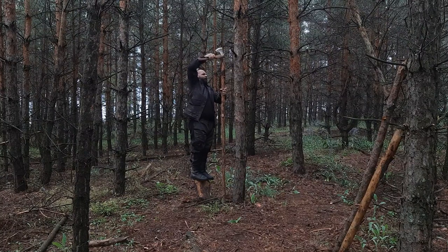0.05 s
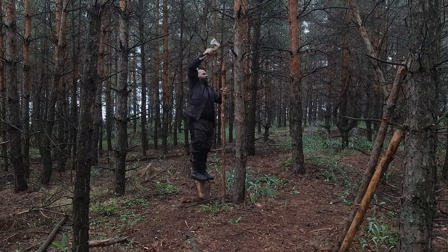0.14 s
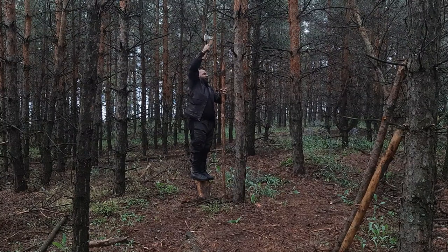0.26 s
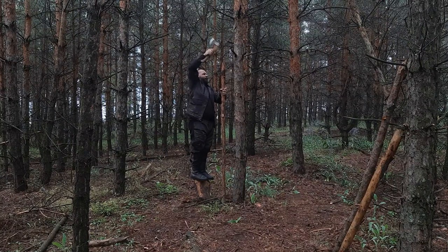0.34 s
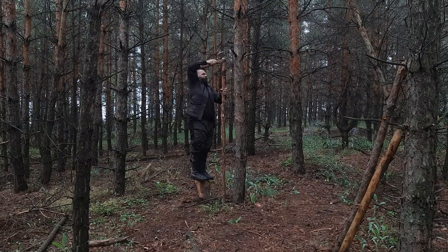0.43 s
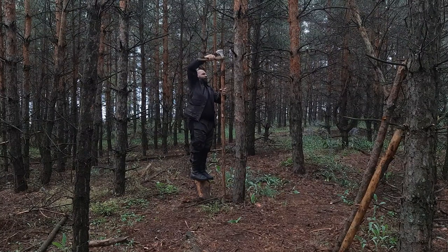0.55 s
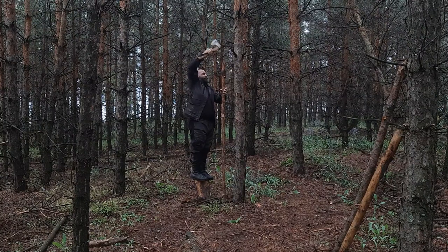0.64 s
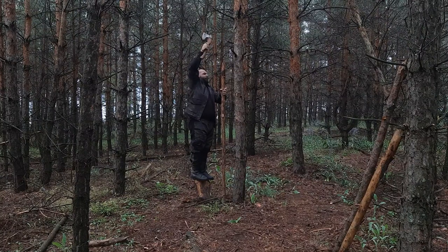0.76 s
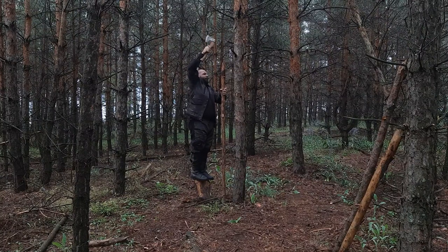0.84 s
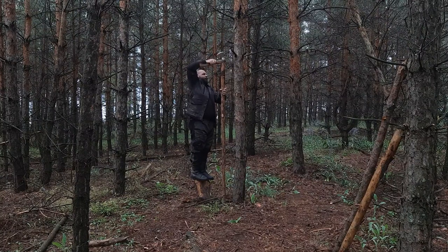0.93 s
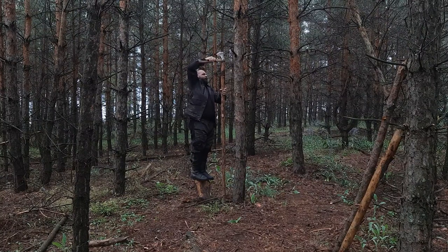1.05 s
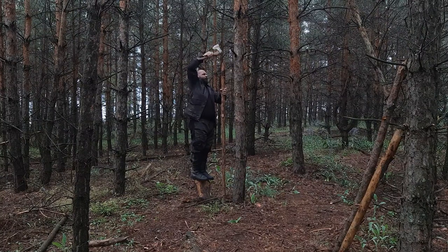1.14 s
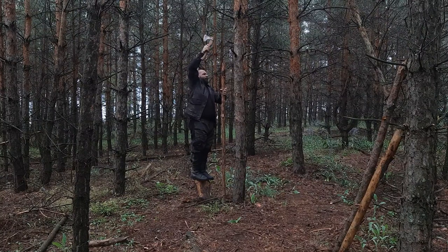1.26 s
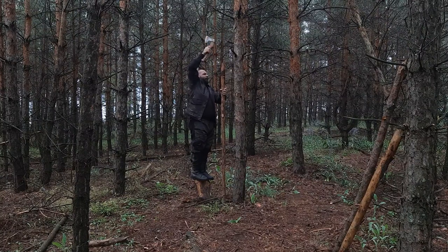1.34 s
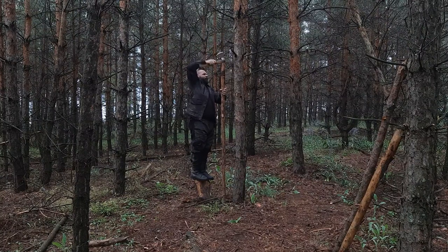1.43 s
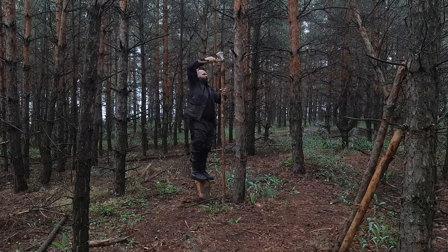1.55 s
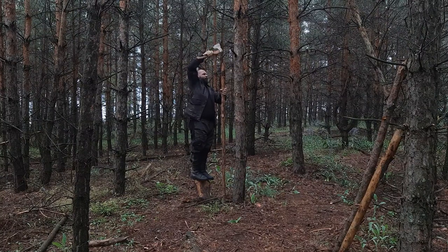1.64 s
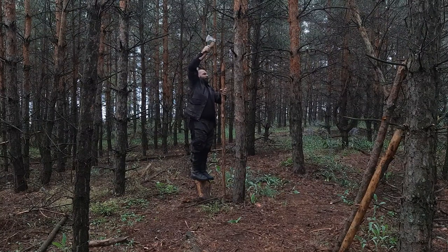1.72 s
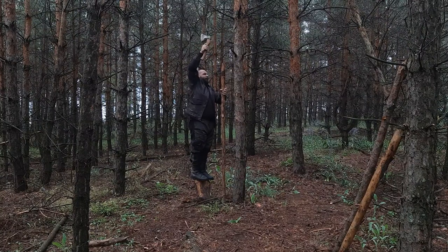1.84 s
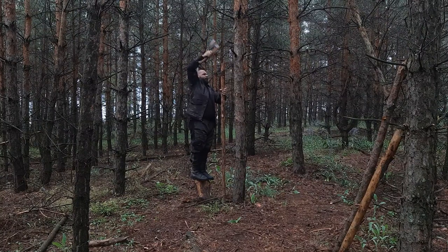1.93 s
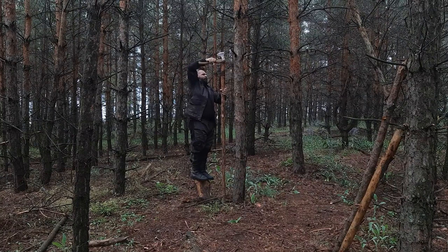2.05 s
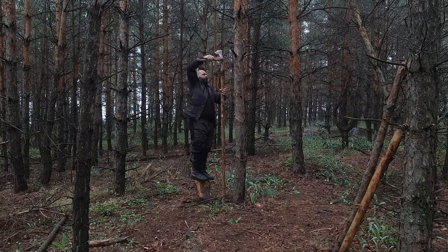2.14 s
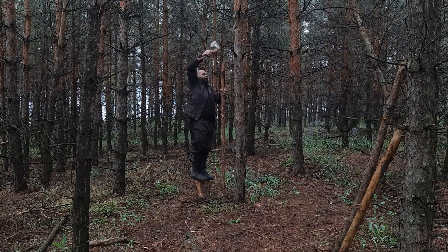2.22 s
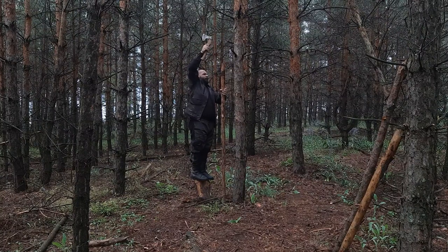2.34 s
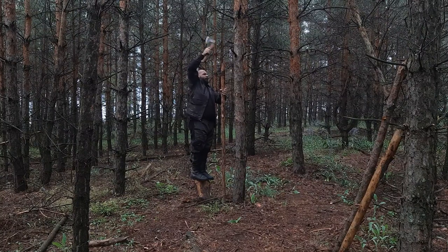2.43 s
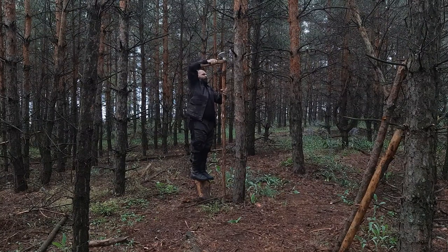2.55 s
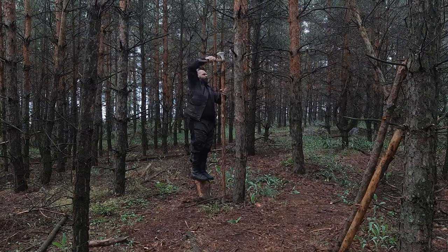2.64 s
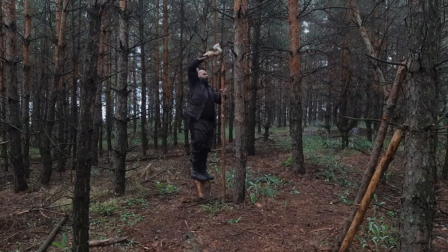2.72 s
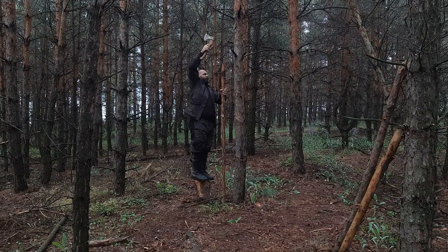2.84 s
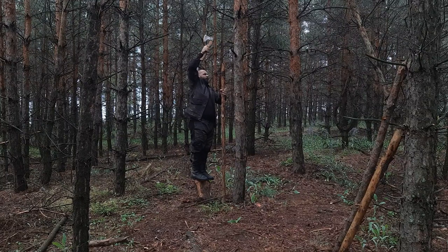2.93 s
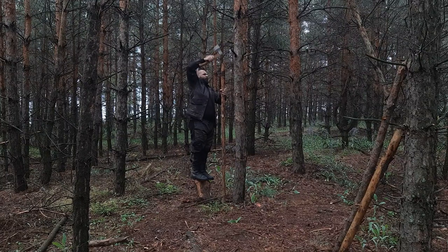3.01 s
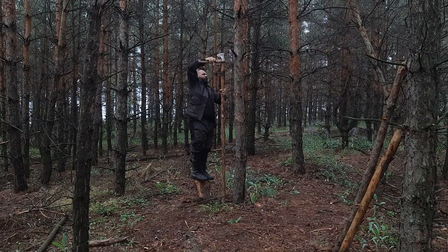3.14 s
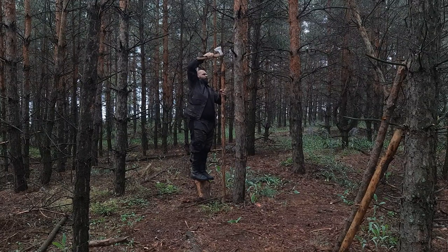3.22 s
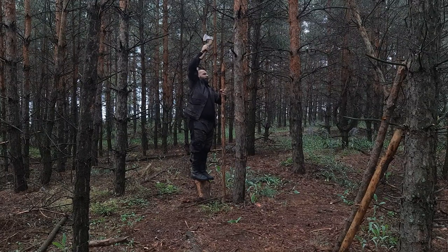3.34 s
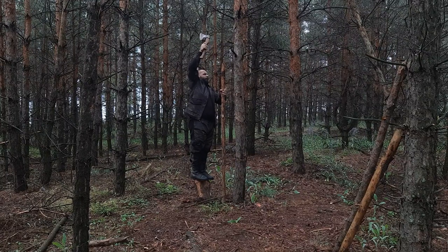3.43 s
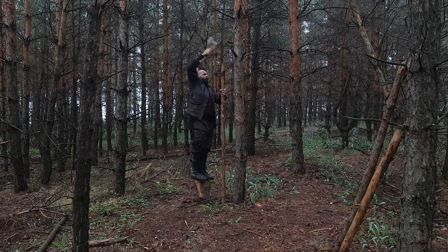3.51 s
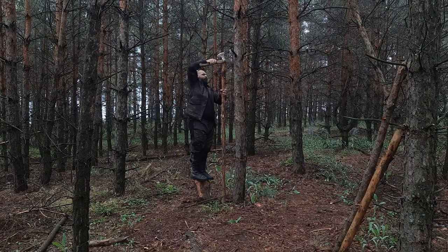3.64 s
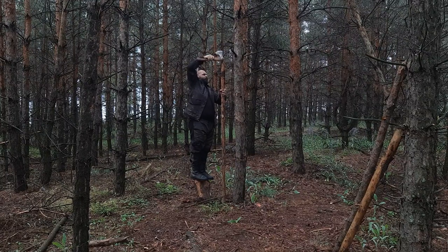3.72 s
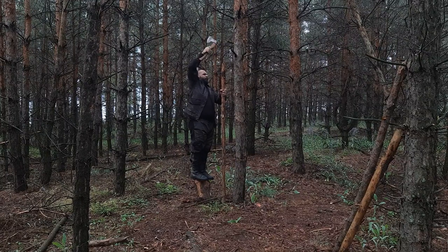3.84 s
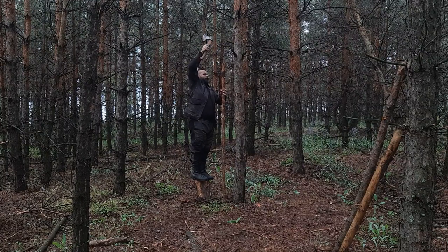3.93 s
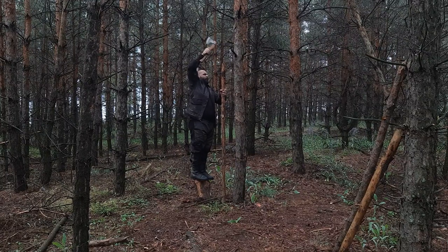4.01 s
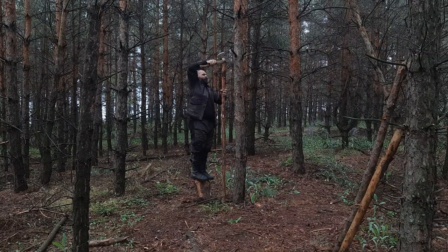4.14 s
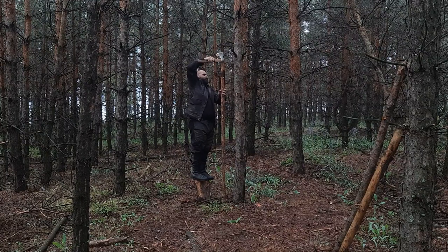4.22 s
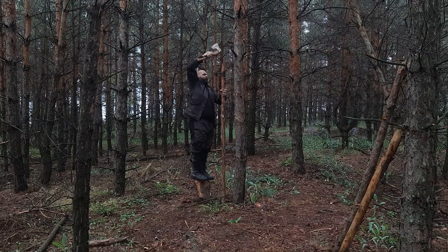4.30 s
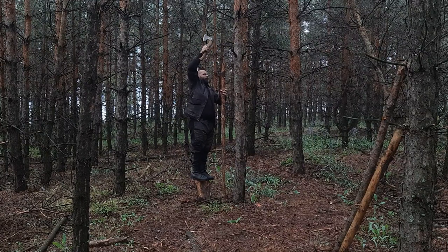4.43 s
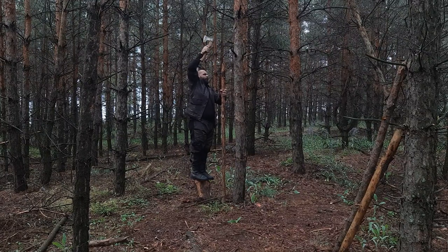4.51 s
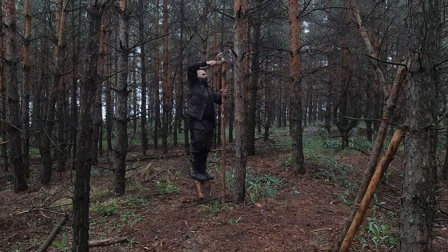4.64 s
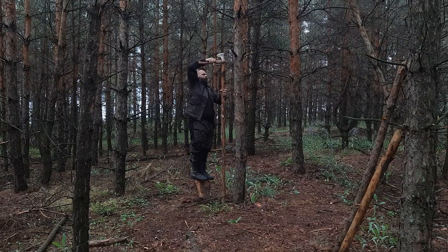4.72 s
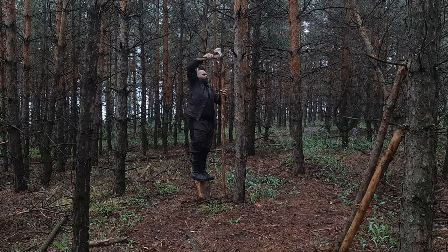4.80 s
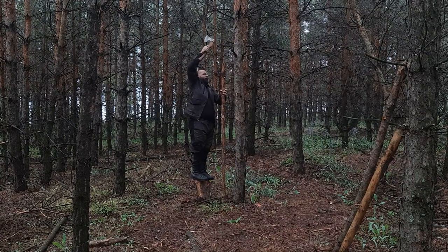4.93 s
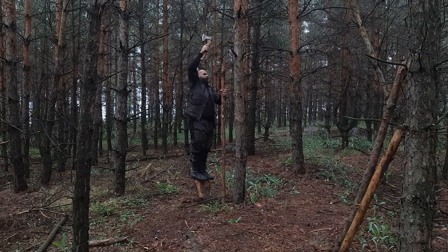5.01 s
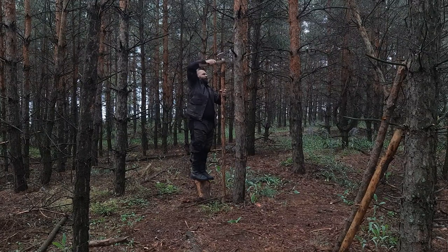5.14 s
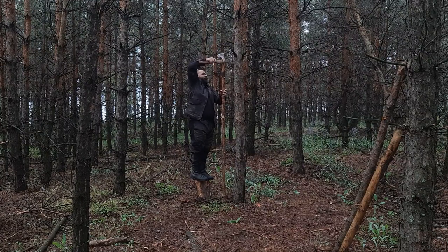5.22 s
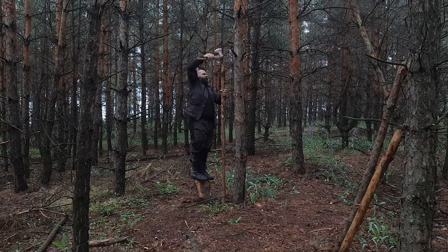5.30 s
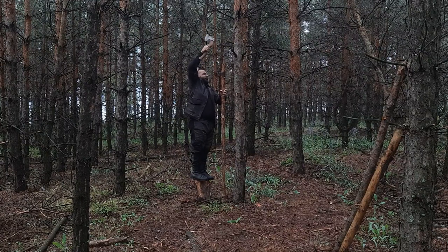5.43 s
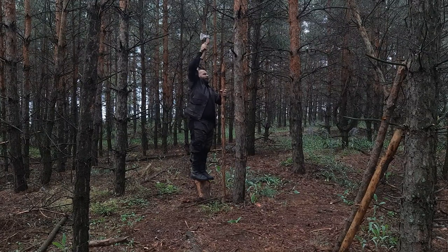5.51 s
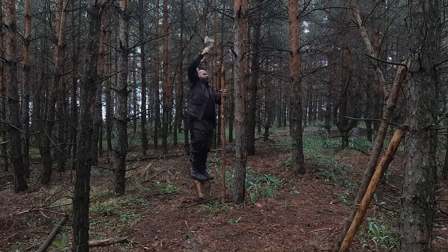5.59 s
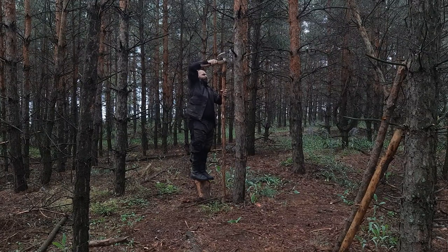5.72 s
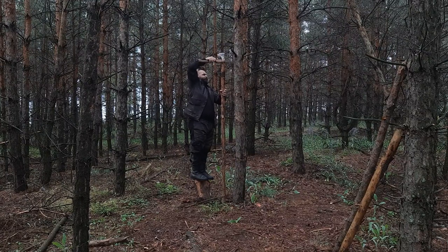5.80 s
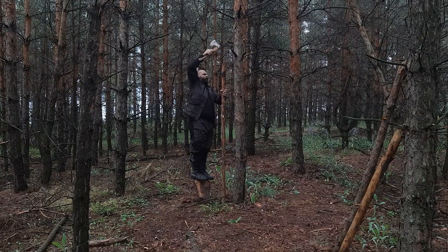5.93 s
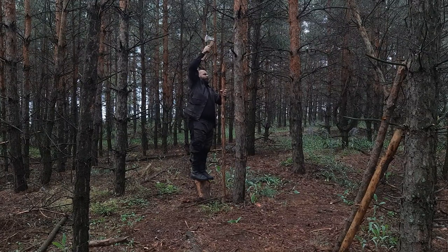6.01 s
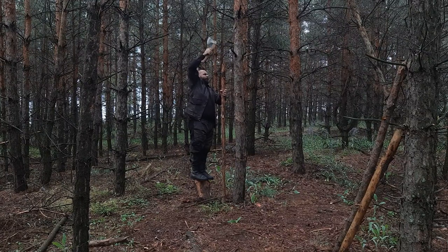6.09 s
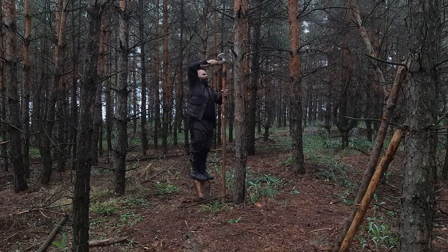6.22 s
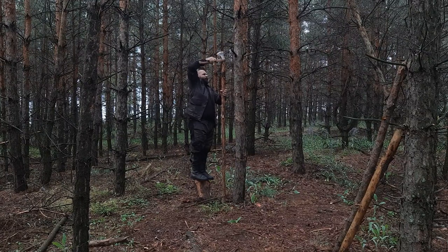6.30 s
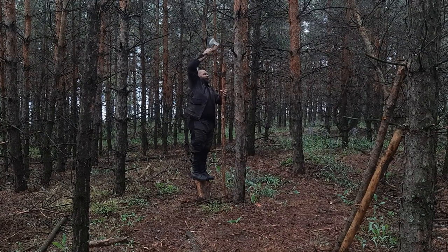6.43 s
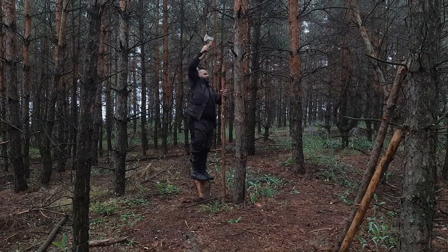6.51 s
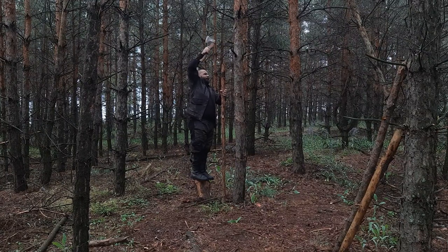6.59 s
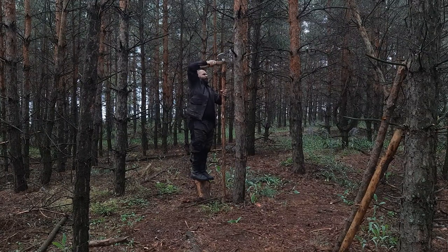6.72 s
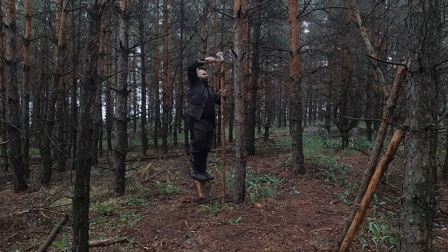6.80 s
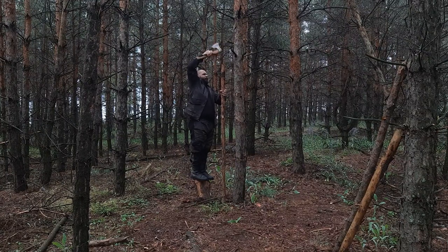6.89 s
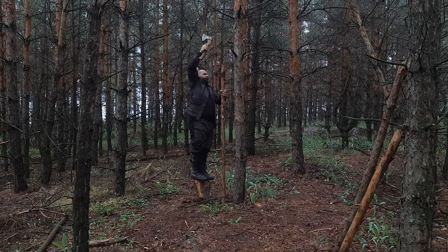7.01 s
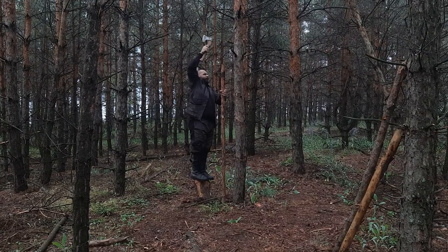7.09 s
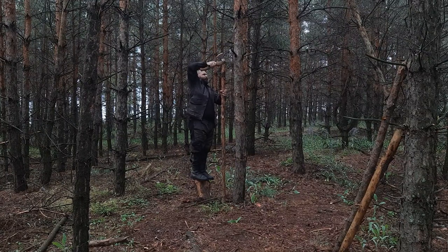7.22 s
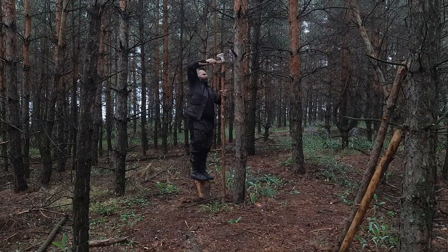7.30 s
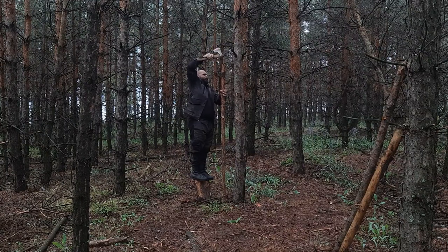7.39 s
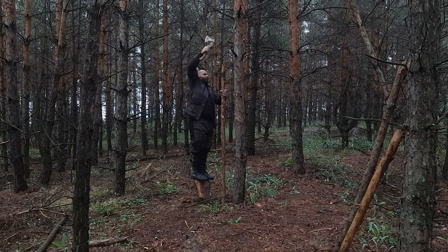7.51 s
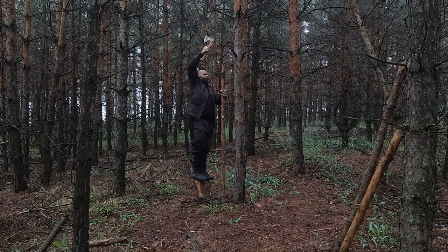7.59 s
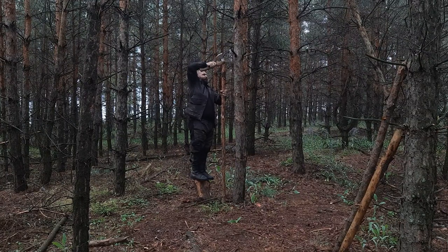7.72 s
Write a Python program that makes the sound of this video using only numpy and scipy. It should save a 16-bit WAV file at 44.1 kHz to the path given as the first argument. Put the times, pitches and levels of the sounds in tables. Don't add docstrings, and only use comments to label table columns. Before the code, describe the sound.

Regular axe-back blows on wood, roughly two a second, uneven in force: most are loud and crisp, a few softer, one near the end very weak and hollow. Short dry cracks with a low body scatter into a forest reverberation lasting about a second. Between them, tiny distant bird trills, high chips and thin whistles over a quiet, dull rumble and faint hiss. Single steady mono microphone at some distance.

```python
import sys
import numpy as np
from scipy import signal
from scipy.fft import rfft, irfft
from scipy.io import wavfile
from scipy.ndimage import uniform_filter1d

SR = 44100
rng = np.random.default_rng(int(sys.argv[2]) if len(sys.argv) > 2 else 0)


def master_out(mix):
    frames = np.transpose(np.atleast_2d(mix))
    ceiling = np.clip(frames, -1, 1)
    pcm = np.round(ceiling * 32767).astype(np.int16)
    wavfile.write(sys.argv[1], SR, pcm)


def elevation(decibels):
    levels = np.asarray(decibels, float)
    return 10 ** (levels / 20)


N = 341775

BLOWS = [(0.0523, 1.5, -2.5, -2, 0.5), (.575, 2.5, -1.5, -2, -0.4), (1.0999, -4, -0.7, -6.5, 0.5),
         (1.6019, -3.5, -2.5, -5.5, 2.5), (2.1452, -0.5, 2, 6.5, -9), (2.675, 1.5, -3.5, -2, 0.4),
         (3.209, -3.5, -4, -6.5, 4), (3.7391, 2, 3, -1, -1), (4.2557, 3, -2, 0, -0.8),
         (4.7856, -7, -3.5, -3.5, 7), (5.3076, 3.5, 4.5, 0.5, -3.2), (5.8447, 4, 1.5, 5, -0.8),
         (6.3376, -14, 4, -6, 11.5), (6.8483, 0.5, -0.3, 2.5, -0.3), (7.3677, 2.5, -1, 0, -0.5)]


def evened(x):
    return x / np.sqrt(np.mean(x ** 2) + 1e-20)


def read(points, hz, column=1):
    columns = np.transpose(points)
    return np.interp(np.log(hz + 1), np.log(columns[0] + 1), columns[column])


def add(mix, s, sound):
    at = round(s * SR)
    sound = sound[max(-at, 0):]
    part = mix[max(at, 0):][:len(sound)]
    part += sound[:len(part)]


def late(x, s):
    lag = round(s * SR)
    return np.concatenate([np.zeros(lag), x[:len(x) - lag]])


def ring(modes, t, contact_s, tune=1):
    free = np.zeros(len(t))
    for hz, db, t60, sign in modes:
        free += sign * elevation(db - 60 * t / t60) * np.sin(2 * np.pi * hz * tune * t)
    force = np.sin(np.pi * np.clip(t[:600] / contact_s, 0, 1))
    return np.convolve(free, force / force.sum())[:len(t)]


def levels(s, knock_db, bright_db, tick_db, hollow_db):
    lower_db = 0.78 + 0.34 * knock_db + 0.13 * bright_db
    thump_db = 0.33 - .03 * knock_db
    return s, knock_db, thump_db, lower_db, knock_db + bright_db, tick_db, knock_db + hollow_db


def steel_tick(t, tick_db):
    # frequency in Hz, level in dB per Hz.
    tick_spectrum = [(1760, -17.5), (3000, -6), (4300, -12.5), (5900, -5), (7840, -10), (9180, -17.5),
                     (12200, -22), (15300, -31.5)]
    tick_t60, splinter_t60, splinter_share = .005, .03, .25
    decay = elevation(-60 * t / tick_t60) + splinter_share * elevation(-60 * t / splinter_t60)
    burst = late(rng.standard_normal(len(t)) * decay, .0024)
    colour = elevation(read(tick_spectrum, np.fft.rfftfreq(len(t), 1 / SR)))
    steel = irfft(rfft(burst) * colour)
    return elevation(tick_db - 24.5) * steel / abs(steel).max()


def wood_knock(t, lower_db, knock_db, upper_db, hollow_db):
    # frequency in Hz, level in dB, t60 in seconds, sign of the push.
    lower_modes = [(530, -15, .012, -1), (640, -27, .05, 1), (714, -22, .07, 1), (808, -28, .07, 1)]
    main_modes = [(1231, -6, .014, -1), (1498, -9, .012, 1), (1666, -23, .09, -1)]
    upper_modes = [(1842, -26, .06, 1), (2134, -30, .025, 1), (2220, -25, .046, 1), (2655, -22, .012, 1)]
    # frequency in Hz, level in dB, t60 in seconds, sign.
    hollow_mode = [(1005, -13, .02, 1)]
    groups = [(lower_db, lower_modes), (knock_db, main_modes), (upper_db, upper_modes), (hollow_db, hollow_mode)]
    knock = np.zeros(len(t))
    for db, modes in groups:
        tune = 1 + .006 * np.clip(rng.standard_normal(), -2, 2)
        knock += elevation(db) * ring(modes, t, .0004, tune)
    return knock


def pole_thump(t, thump_db):
    # frequency in Hz, level in dB, t60 in seconds, sign of the push.
    bending_modes = [(100, -16.3, .055, -1), (172, -9.2, .043, 1), (276, -10.5, .04, -1),
                     (60, -34, .14, -1), (345, -25, .03, 1)]
    return elevation(thump_db) * ring(bending_modes, t, .0025)


def blow(s, knock_db, thump_db, lower_db, upper_db, tick_db, hollow_db):
    t = np.arange(8192) / SR
    steel = steel_tick(t, tick_db)
    knock = late(wood_knock(t, lower_db, knock_db, upper_db, hollow_db), .0026)
    thump = late(pole_thump(t, thump_db), .0024)
    mirrored = late(-.6 * steel - .75 * knock, .00168)
    return s - .002, (steel + knock + mirrored + thump) * signal.windows.tukey(len(t), .02)


def head_hum(knock_db, bright_db):
    hum_db = -57 + 1.2 * (knock_db + bright_db)
    return ring([(1860, hum_db, .9, 1)], np.arange(SR) / SR, .0004)


def axe_on_pole():
    # start in seconds, frequency in Hz, level in dB, t60 in seconds.
    off_spot = [
        (1.1003, 2042, -12.5, 0.0155),
        (1.1003, 727, -21, .04),
        (2.1467, 770, -7, 0.027),
        (2.1463, 2404, -16.5, 0.028),
        (4.2562, 2103, -15, 0.0327),
        (5.3092, 1369, -26, 0.079),
        (6.3405, 1938, -19.5, 0.0204),
        (6.3381, 350, -17, 0.0262),
        (7.3684, 2030, -16.5, .025),
    ]
    # delay in seconds, level in dB.
    trunks = [
        (0.015, -22),
        (0.032, -32),
        (0.053, -30),
        (.125, -31.5),
    ]
    axe = np.zeros(N)
    for row in BLOWS:
        add(axe, *blow(*levels(*row)))
    for s, *mode in off_spot:
        add(axe, s, ring([(*mode, 1)], np.arange(6000) / SR, .0004) * np.linspace(1, 0, 6000))
    for s, knock_db, bright_db, *_ in BLOWS:
        add(axe, s, head_hum(knock_db, bright_db))
    for delay, db in trunks:
        add(axe, delay, elevation(db) * signal.lfilter([1, -1], [1, -.92], axe))
    return axe


def all_round(s, knock_db, thump_db, lower_db, upper_db, tick_db, _):
    # frequency in Hz, level in dB.
    usual_power = [(200, -4.5), (850, -7), (1350, -14.5), (2200, -19), (5000, -22.5)]
    hz, usual_db = np.transpose(usual_power)
    change_db = (thump_db, lower_db, knock_db, upper_db, 0.6 * tick_db)
    colour = np.transpose([hz, usual_db + change_db])
    click = irfft(elevation(read(colour, np.fft.rfftfreq(512, 1 / SR))))
    return s - 256 / SR, 23.54 * np.roll(click, 256) * np.hanning(512)


def forest(x):
    # frequency in Hz, early level in dB, early t60 in seconds,
    # late level in dB, late t60 in seconds.
    scattering = [(58, -24.5, 0.48, -50.5, 0.56), (163, -12.5, 0.25, -36.5, 0.81),
                  (380, -24.5, 0.16, -34.5, 0.3), (648.6, -13.5, 0.32, -22, 1.35),
                  (1620, -8, 0.31, -18, 1.34), (2510, -19, 0.32, -19.5, 0.76),
                  (3140, -24, 0.28, -23.5, 0.71), (6500, -28.5, 0.34, -33.5, 0.7)]
    length, out = round(1.5 * SR), np.zeros(len(x))
    turn = np.pi * (np.arange(len(x)) / SR - 1) / 1.57
    for k in range(3):
        taps = np.zeros(length)
        at = np.arange(300, length - 16, 16) + rng.integers(0, 16, (length - 301) // 16)
        taps[at] = rng.choice([-1., 1.], len(at))
        hz, t, z = signal.stft(taps, SR, nperseg=512)
        early_db, early_t60, late_db, late_t60 = (read(scattering, hz, c)[:, None] for c in range(1, 5))
        early = elevation(early_db - 60 * (t / early_t60) ** 1.225) / np.sqrt(early_t60)
        fade = np.hypot(early, elevation(late_db - 60 * t / late_t60) / np.sqrt(late_t60))
        fade *= elevation(-8.0 * np.log2(np.maximum(hz[:, None] / 7000, 1)))
        fade[hz > 15650] *= .05
        rise = 0.0012 + 14 / (hz[:, None] + 400)
        tail = signal.istft(z * fade * (1 - np.exp(-t / rise)), SR, nperseg=512)[1] * 0.14
        tail[:300] = 0
        share = np.sqrt(2 / 3) * np.cos(turn + k * np.pi / 3)
        out += signal.fftconvolve(x * share, tail)[:len(x)]
    return out


def forest_tail(axe):
    spread = np.zeros(SR + N)
    add(spread, .53, all_round(*levels(*BLOWS[0]))[1])
    for row in BLOWS:
        s, click = all_round(*levels(*row))
        add(spread, 1 + s, click)
    spread[SR:] += 0.031 * axe
    return forest(spread)[SR:]


def note(hz, db, edge, unsteady):
    drift = evened(uniform_filter1d(rng.standard_normal(SR), 200))[:len(hz)]
    phase = 2 * np.pi * np.cumsum(hz * (1 + unsteady * drift)) / SR
    return np.sqrt(2) * elevation(db) * np.sin(phase) * signal.windows.tukey(len(hz), min(edge, 1))


def trill(s, length, db, top_hz):
    trills_per_s, slide_hz = 54, 822
    beak_hz, beak_width_hz = 3790, 140
    t = np.arange(0, length, 1 / SR)
    cycle = (trills_per_s * (t - .029)) % 1
    dips = np.interp(cycle, [0, .15, .6, 1], [1, 0, .42, 1])
    dips = uniform_filter1d(np.where(t > .02, dips, .25), 40)
    hz = top_hz + 170 - 250 * np.exp(-t / 0.055) - slide_hz * dips
    beak_db = -10 * np.log10(1 + ((hz - beak_hz) / beak_width_hz) ** 2)
    return s - .008, note(hz, db + 3.5 + beak_db - 9 * np.exp(-t / .05), .3, .004)


def chip(s, db):
    u = np.linspace(0, 1, round(.038 * SR))
    low_hz = np.interp(u, [0, .12, .5, 1], [7000, 7450, 7250, 6400])
    high_hz = np.interp(u, [0, .3, .5, 1], [7900, 8650, 8600, 7800])
    low = np.pad(note(low_hz, db, .3, .002), (0, 800))
    high = np.pad(note(high_hz, db, .3, .002), (0, 800))
    return s, late(low, .008) + elevation(-2.5) * high


def whistle(length, db, from_hz, to_hz):
    return note(np.linspace(from_hz, to_hz, round(length * SR)), db, .5, .02)


def birds():
    # start in seconds, length in seconds, level in dB, top pitch in Hz.
    trills = [
        (-.1, 0.27, -58, 3903),
        (1.449, 0.213, -62.5, 4051),
        (2.261, 0.19, -59, 3956),
        (3.077, 0.21, -58.5, 4020),
        (3.811, 0.15, -55, 3924),
        (4.502, 0.203, -61, 3919),
        (5.322, 0.1756, -55, 3930),
        (6.015, 0.18, -57.5, 3943),
        (6.773, 0.25, -62.5, 3900),
        (7.62, 0.32, -61, 3950),
    ]
    # start in seconds, level in dB.
    chips = [
        (0.18, -69),
        (1.387, -71.5),
        (3.935, -71.5),
        (5.018, -75.5),
        (6.22, -72.5),
        (7.523, -68.5),
    ]
    # start in seconds, length in seconds, level in dB, first and last pitch in Hz.
    whistles = [(.155, .03, -60, 3100, 3700), (.15, .2, -82, 7600, 6600), (.335, .11, -77, 6500, 3500),
                (.7, .18, -85, 8600, 8250), (.93, .07, -82, 7400, 7350), (1.86, .07, -83, 7600, 7100),
                (6.1, .05, -83, 7400, 7300), (2.86, .2, -84, 3260, 3180), (5.2, .12, -87, 3250, 3250),
                (4.52, .3, -84, 4800, 4800), (7.1, .1, -85, 5000, 4750), (3.6, .12, -79, 3850, 3600)]
    # start in seconds, level in dB.
    answers = [
        (1.82, -78),
        (3.5, -78),
        (4.1, -77),
        (5.74, -79),
        (6.6, -78),
    ]
    dry = np.zeros(N)
    for row in trills:
        add(dry, *trill(*row))
    for row in chips:
        add(dry, *chip(*row))
    for s, *glide in whistles:
        add(dry, s, whistle(*glide))
    for s, db in answers:
        add(dry, s, whistle(.09, db, 4180, 3780))
    t = np.arange(SR) / SR
    tail = rng.standard_normal(SR) * elevation(-60 * t / 0.82) * (t > .006)
    return dry + elevation(0.5) * signal.fftconvolve(dry, tail / np.linalg.norm(tail))[:N]


def air():
    # frequency in Hz, level in dB per Hz.
    air_spectrum = [(30, -6.5), (88, 7), (122, -13), (930, -22.5), (1150, -39.5), (2530, -42.5),
                    (4000, -28.5), (16000, -32)]
    frames, hz = N // 512 + 5, np.fft.rfftfreq(2048, 1 / SR)
    a, b, patches = rng.standard_normal((frames, 1025, 3)).T
    patches = evened(uniform_filter1d(uniform_filter1d(patches, 16, 0), 10, 1))
    patch_db = 1.0 + 0.74 * (hz[:, None] < 150)
    z = (a + 1j * b) * elevation(read(air_spectrum, hz)[:, None] + patch_db * patches)
    z[hz > 15650] *= .1
    noise = signal.istft(z, nperseg=2048, noverlap=1536)[1][:N]
    return elevation(-63 + 2.0) * evened(noise)


def scene():
    axe = axe_on_pole()
    return (axe + forest_tail(axe) + birds() + air())[None]


def top_cut(x):
    return signal.sosfilt(signal.butter(12, 16670, fs=SR, output="sos"), x)


def record(dry):
    bass_cut = signal.butter(2, 52, "high", fs=SR, output="sos")
    dry = signal.oaconvolve(dry, signal.firwin(255, 16400, fs=SR)[None], "same")
    return top_cut(signal.sosfilt(bass_cut, dry))


dry = scene()
out = record(dry)
master_out(out)
```